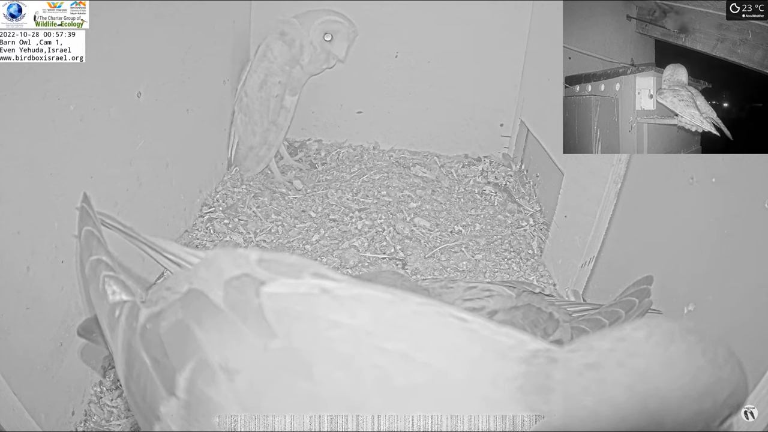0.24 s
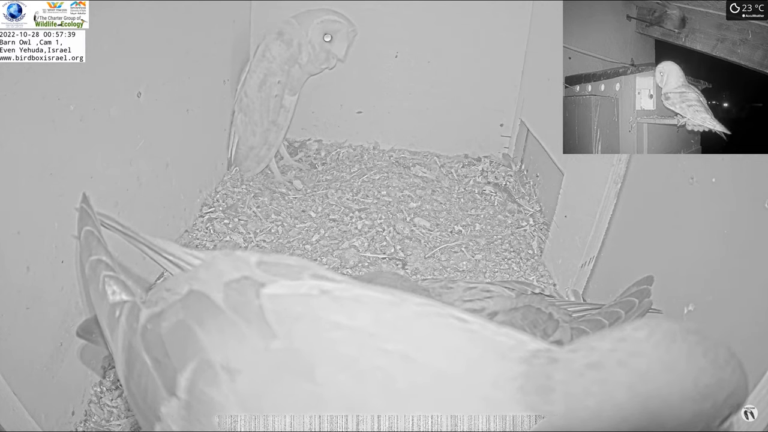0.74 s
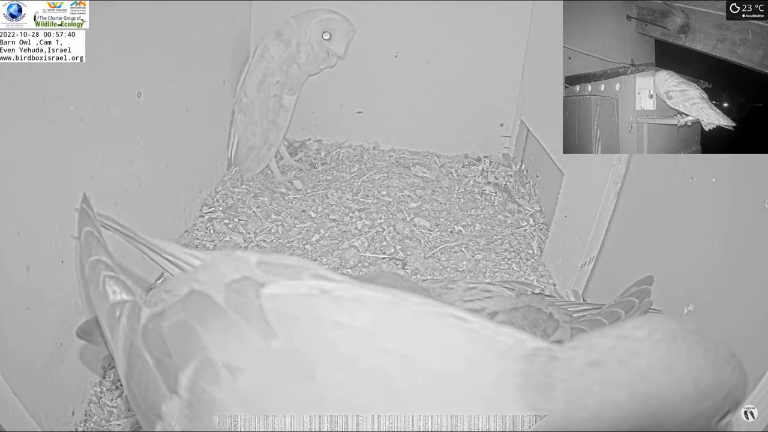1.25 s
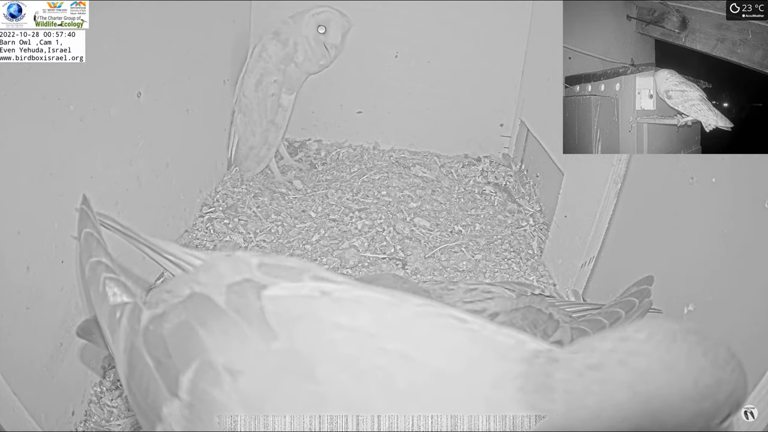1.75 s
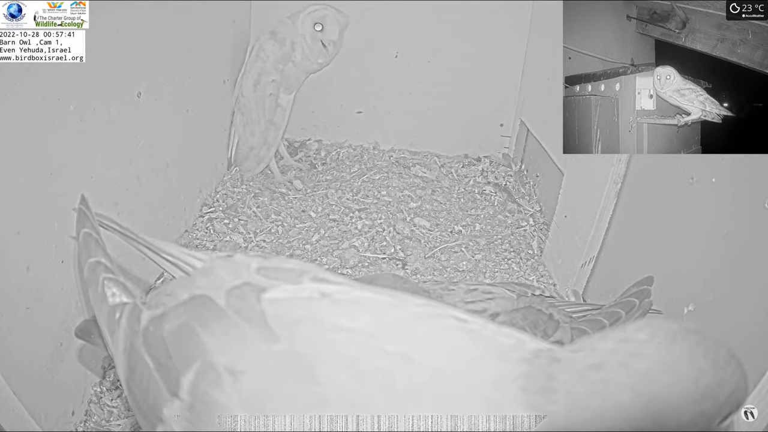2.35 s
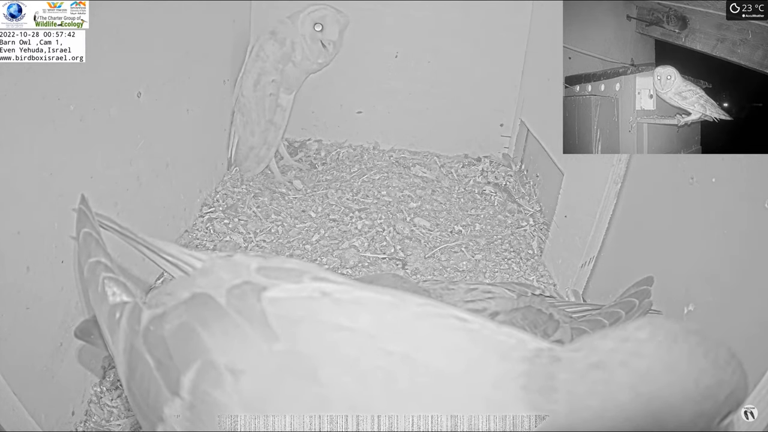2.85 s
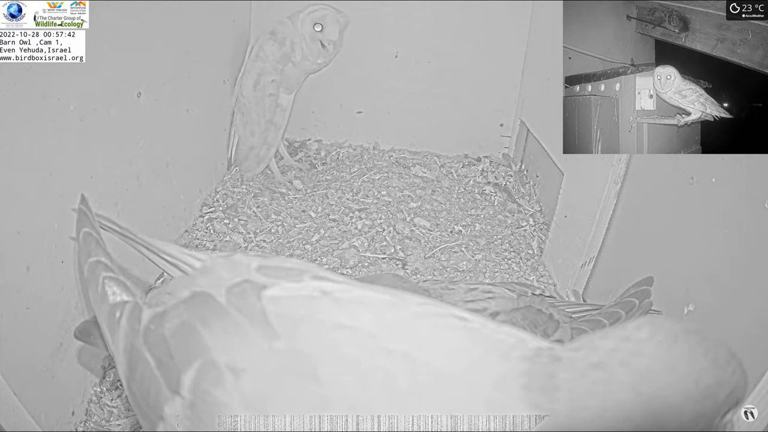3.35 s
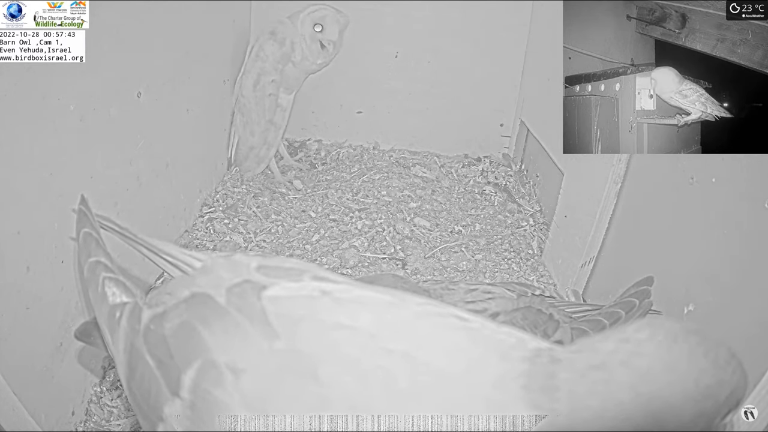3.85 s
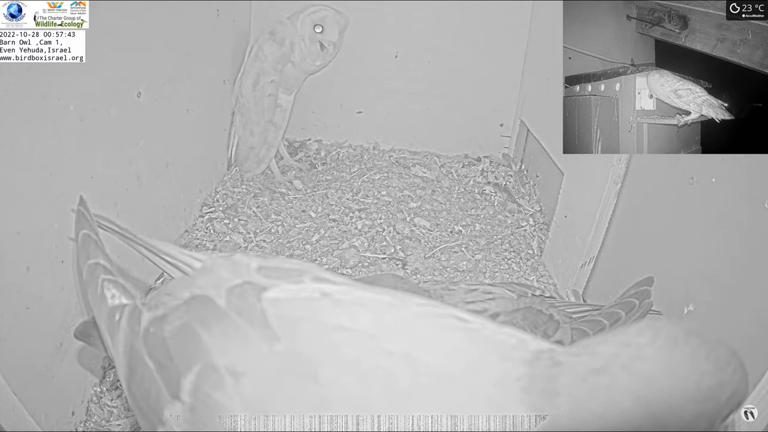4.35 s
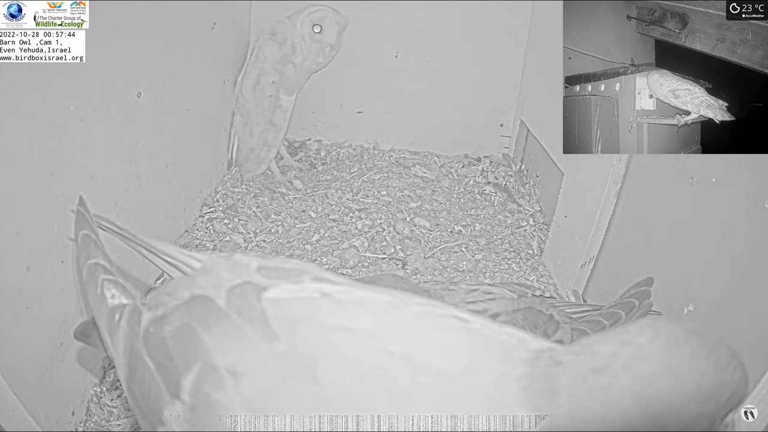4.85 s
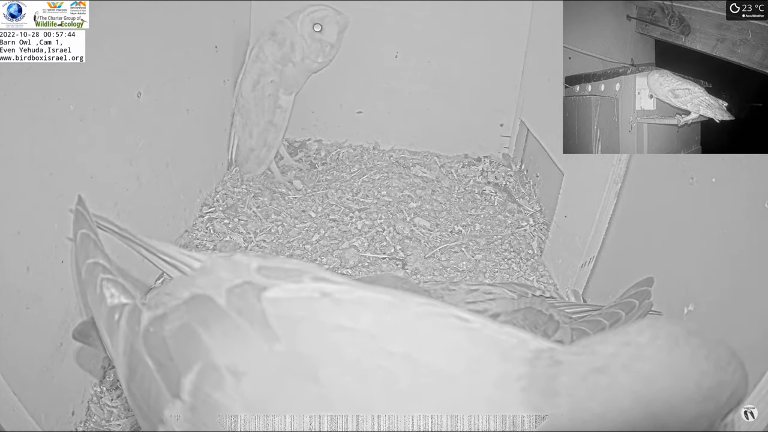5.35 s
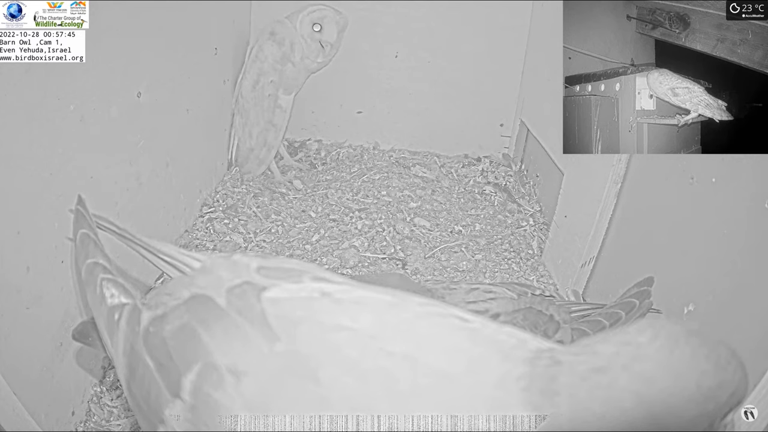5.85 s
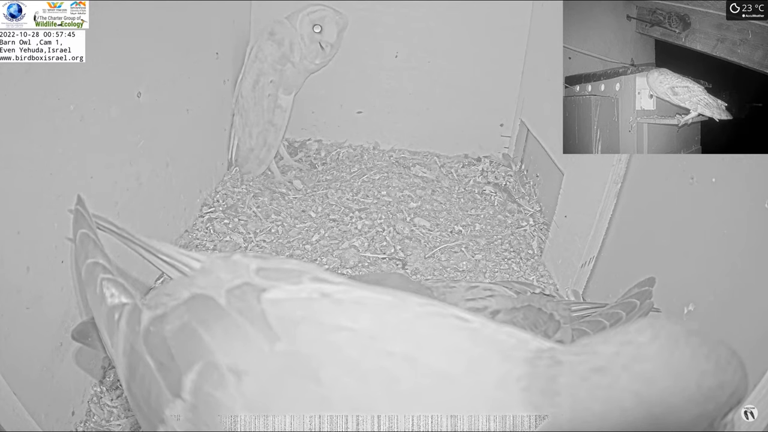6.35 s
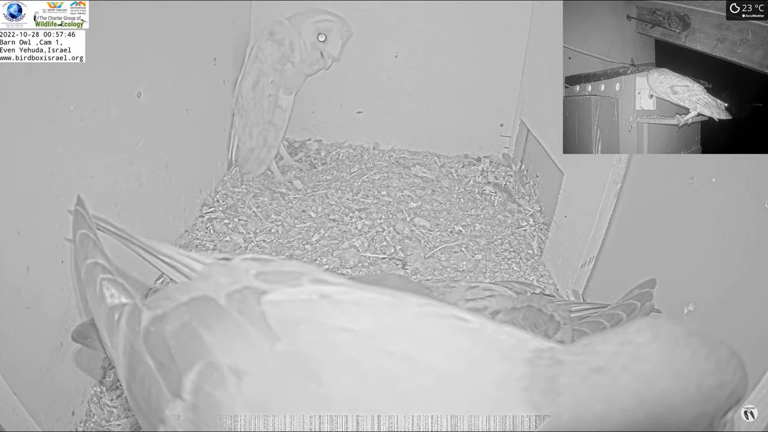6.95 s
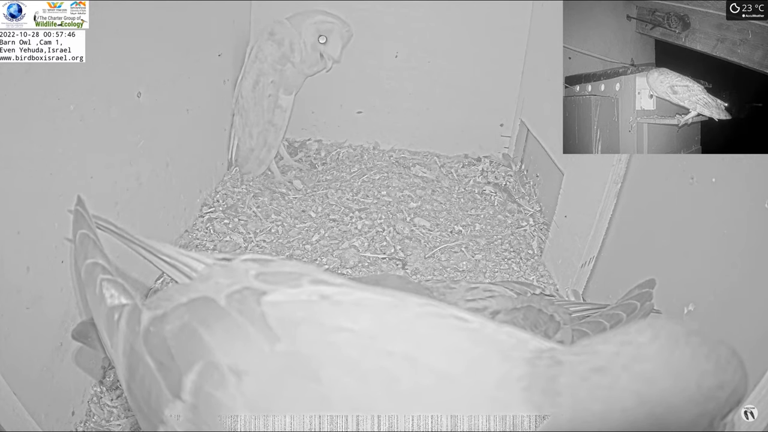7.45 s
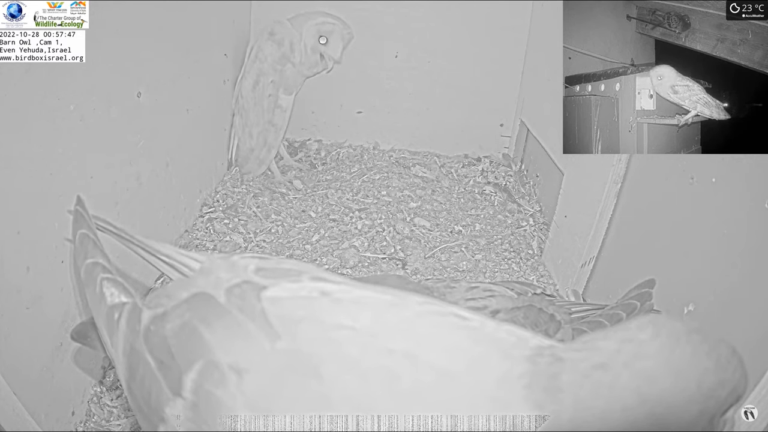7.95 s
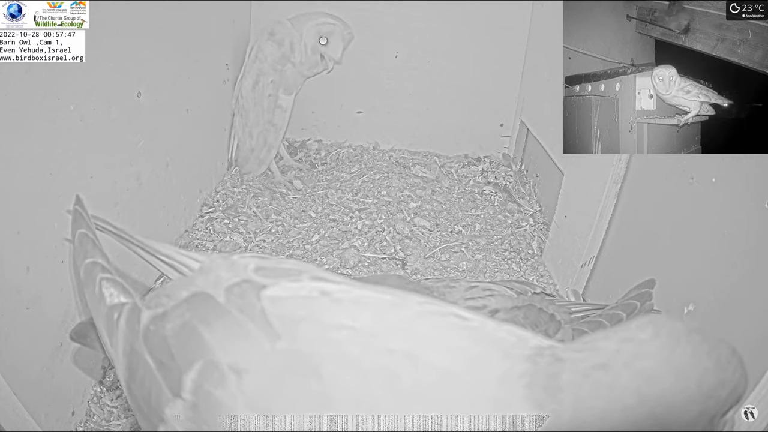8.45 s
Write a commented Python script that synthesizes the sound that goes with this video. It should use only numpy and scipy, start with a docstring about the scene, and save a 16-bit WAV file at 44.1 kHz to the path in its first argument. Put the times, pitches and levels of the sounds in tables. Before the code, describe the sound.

Inside a wooden nest box, an owl gives long rasping, hissing screeches with brief pauses, soft foot knocks, dry ticks and low hum beneath.

```python
"""The rough whistle that ends one screech, then two more long hissing screeches of a barn owl in a wooden box.
Each opens as a rush of air (shaped noise), then a rasp catches (noise ringing at the pitch of the syrinx)
and gives way towards the end to an unsteady whistle (sines); moving resonances of the bill shape the hiss.
A low hum of filtered noise lies below; feet knock (damped sines), claws scrape, dry ticks and squeaks pass,
and the sound cuts out now and then for a few milliseconds."""
import sys
import numpy as np
from scipy import signal
from scipy.fft import rfft, irfft, next_fast_len
from scipy.io import wavfile
from scipy.ndimage import uniform_filter1d

SR = 44100
rng = np.random.default_rng(int(sys.argv[2]) if len(sys.argv) > 2 else 0)


def to_wav(sig):
    """Store sig (one row per channel, or 1-D mono) as 16-bit WAV at the path in sys.argv[1].

    Samples outside -1..1 are clipped; the rate is SR.
    """
    pcm = np.clip(np.atleast_2d(sig), -1, 1) * 32767
    pcm = np.round(pcm).astype(np.int16)
    wavfile.write(sys.argv[1], SR, pcm.T)  # frames by channels


N = 383669

TIME = np.arange(N) / SR
# turbulence is shaped in overlapping frames of 2048 samples, 512 apart
FRAME_S = np.arange(N // 512 + 6)[:, None] * 512 / SR
BIN_HZ = np.fft.rfftfreq(2048, 1 / SR)

# Spectrum of the rush of air, in screeches and sighs. Each row: frequency in Hz, relative level in dB per Hz.
RUSH_SPECTRUM = [(150, -35), (200, -49.5), (240, -1.5), (305, 1.5), (360, -8.5), (480, 1.5), (570, -7),
                 (640, -2), (720, -8), (800, -30), (1000, -21), (1200, -13.5), (1500, -20.5), (2500, -43.5)]


def gain_of(db):
    """Decibels to amplitude."""
    return 10 ** (np.asarray(db) / 20)


def evened(x):
    """Scaled to an rms of one."""
    return x / np.sqrt(np.mean(x ** 2) + 1e-20)


def spectrum(points, hz):
    """Gain of a (Hz, dB) table, joined by straight lines on a log-frequency axis."""
    f, db = np.transpose(points)
    return gain_of(np.interp(np.log(hz + 1), np.log(f), db))


def curve(rows, t):
    """A (seconds, value) table read at times t."""
    s, value = np.transpose(rows)
    return np.interp(t, s, value)


def add(mix, s, sound):
    """Lays a sound into the mix at s seconds."""
    part = mix[max(round(s * SR), 0):][:len(sound)]
    part += sound[:len(part)]


def coloured(x, gain):
    """Filters x by a gain that is a function of frequency."""
    size = next_fast_len(len(x))
    hz = np.fft.rfftfreq(size, 1 / SR)
    return irfft(rfft(x, size) * gain(hz), size)[:len(x)]


def wander(rate_hz):
    """Smooth random drift of rms one, mostly slower than rate_hz, drawn at every 16th sample."""
    noise = rng.standard_normal(next_fast_len(N // 16 + 2))
    steps = coloured(noise, lambda hz: np.exp(-(hz / 16 / rate_hz) ** 2))
    return evened(np.interp(np.arange(N) / 16, np.arange(len(steps)), steps))


def resonance(hz, centre, half_width):
    """Gain of a resonance: one at its centre, a half at half_width to either side."""
    return 1 / (1 + ((hz - centre) / half_width) ** 2)


def resonances(rows, hz):
    """Summed gain of a (Hz, full width Hz, dB) table of resonances."""
    return sum(gain_of(db) * resonance(hz, f, width / 2) for f, width, db in rows)


def bumps(rows, hz):
    """Level in dB of a (Hz, width Hz, dB) table of bell-shaped peaks and notches."""
    return sum(db * 2 ** -(2 * (hz - f) / width) ** 2 for f, width, db in rows)


def box(hz):
    """Gain of the standing waves between the boards."""
    # Peaks and notches that the box gives the screeches. Each row: centre in Hz, width in Hz, height in dB.
    box_modes = [(1154, 55, -9.5), (1191, 41.7, 8.5), (1346, 61, -15.5), (1450, 110, 3.5), (1657, 78, 8.5),
                 (1766.5, 55, 15), (1792.6, 38.8, -11), (1843, 105, 6), (1948, 55, 5), (2144, 73, 8.5),
                 (2276, 45, 6), (2318, 55, -14), (2920, 55, 7), (2995, 79, 12), (3036, 41, -20),
                 (3350, 83, 10.5), (3967, 130, -2), (4265, 75, 6.5), (6170, 220, -5), (6400, 79, 3.5),
                 (6800, 53, -18), (6860, 160, 1.5), (7350, 55, 2), (7700, 490, -4.5), (8570, 150, 6.5),
                 (9211, 18, 7.5), (9480, 180, 7.5), (9790, 120, 3), (10600, 95, -3.5), (11450, 97, 3),
                 (1868, 30, 2), (10300, 110, -8)]
    return gain_of(bumps(box_modes, hz))


def walls(x, t60=0.025, wet_db=-7):
    """Dense early echoes between the close walls comb the treble finely."""
    t = np.arange(SR // 10) / SR
    echo = rng.standard_normal(len(t)) * gain_of(-60 * t / t60) * (t > .002)
    echo *= gain_of(wet_db) / np.linalg.norm(echo)
    echo[0] = 1  # the direct sound
    return signal.oaconvolve(x, echo / np.linalg.norm(echo))[:N]


def turbulence(shape):
    """Noise of steady power in a moving spectral shape, heard through the box."""
    gain = shape * box(BIN_HZ) * np.ones_like(FRAME_S)
    gain = gain / np.linalg.norm(gain, axis=1, keepdims=True)
    z = gain * (rng.standard_normal(gain.shape) + 1j * rng.standard_normal(gain.shape))
    return evened(signal.istft(z.T, nperseg=2048, noverlap=1536)[1][:N])


def course(t):
    """The screech under way at times t, and how far it has caught, swollen, tired and faded (each 0-1)."""
    # The screeches. Each row: start in seconds, when the rasp catches in seconds, end in seconds,
    # length of the last fade in seconds, time of locking into a whistle in seconds, rush level in dB,
    # rasp level in dB, harsh upper rasp level in dB, hiss level in dB, top hiss level in dB,
    # change of the hiss before the catch in dB, its drift after the catch in dB per second,
    # high hiss resonance after the catch in dB, first hiss resonance in Hz.
    screeches = np.array([(-3, -2.5, .238, .035, 1.6, -65.5, -58.5, -72.5, -74.5, -80.5, -6, 0.5, -16, 6400),
                          (0.8846, 1.5, 5.42, 0.4, .17, -59.4, -56.7, -68.3, -63.8, -63.2, -7.5, -2.5, 0, 6260),
                          (6.11, 6.5, 11.7, .36, .17, -60.9, -51.8, -60.8, -67, -67, -4, 1.37, -8, 5900)])
    catch_s, swell_s, tire_s = 0.072, 1.08, 3.0
    row = np.moveaxis(screeches[np.searchsorted(screeches[:, 0], t, "right") - 1], -1, 0)
    _, catch, end, fade_s = row[:4]
    caught = .5 + .5 * np.tanh((t - catch) / (2 * catch_s))
    swollen = 1 - np.exp(-np.maximum(t - catch, 0) / swell_s)
    tired, faded = (np.clip(1 - (end - t) / length, 0, 1) for length in (tire_s, fade_s))
    return row, caught, swollen, tired, faded


def effort():
    """Gains of the rush, the rasp, the harsh upper rasp, the hiss and its top through all the screeches."""
    attack_s, hiss_attack_s, release_s = 0.065, 0.1, 0.0078
    # each layer's change in dB: before the catch, as the rasp swells, once the owl is tired, in the last fade
    rush_early_db, rush_swell_db, rush_tired_db, rush_fade_db = 1.45, -2.5, 2.6, -12.5
    rasp_early_db, rasp_swell_db, rasp_tired_db, rasp_fade_db = -12.5, 9, -7.7, -4.3
    hiss_tired_db, hiss_fade_db, top_fade_db = -3.5, -6, -9
    # the harsh upper rasp: its level before the catch, its rise after it, its change in the last fade
    harsh_idle_db, harsh_db_per_s, harsh_fade_db = -79.5, 4.35, -9

    row, caught, swollen, tired, faded = course(TIME)
    start, catch, end, _, _, rush_db, rasp_db, harsh_db, hiss_db, top_db, early_hiss_db, drift_db_per_s, *_ = row
    early = 1 - caught
    rasping_s = np.maximum(TIME - catch, 0)
    release = np.clip((end - TIME) / release_s, 0, 1)
    voice_on, hiss_on = (release * (1 - np.exp(-(TIME - start) / rise)) for rise in (attack_s, hiss_attack_s))

    rush = rush_db + rush_early_db * early + rush_swell_db * swollen
    rush += rush_tired_db * tired + rush_fade_db * faded ** 2
    rasp = rasp_db + rasp_early_db * early + rasp_swell_db * swollen
    rasp += rasp_tired_db * tired ** 2.1 + rasp_fade_db * faded
    harsh = harsh_idle_db * early + harsh_db * caught + harsh_db_per_s * rasping_s + harsh_fade_db * faded
    blow = early_hiss_db * early + drift_db_per_s * rasping_s
    hiss = hiss_db + blow + hiss_tired_db * np.sqrt(tired) + hiss_fade_db * faded
    top = top_db + blow + top_fade_db * faded
    voice_gains = voice_on * gain_of([rush, rasp, harsh])
    return *voice_gains, hiss_on ** 1.5 * gain_of(hiss), hiss_on ** 2 * gain_of(top)


def syrinx(t):
    """Pitch in Hz, share of the rasp that is a whistle, and the narrow ring at the pitch in dB."""
    # The first whistle cracks once: time in seconds, half length in seconds, pitch lift in Hz,
    # share of the whistle lost (0-1).
    crack_s, crack_length, lift_hz, lost = (0.089, 0.02502, 49.65, .4)
    # the pitch sags with tiring and drops as the voice stops
    pitch_hz, sag_hz, drop_hz, drop_s = 1763, 275.3, 140, .014
    # the ring sharpens as the rasp swells
    ring_early_db, ring_swell_db, ring_tired_db = -5, 24.5, -11.5
    # share of whistle (0-1): far from the end of a screech and at the very end
    whistle_least, whistle_most = 0.039, 0.933

    (_, _, end, _, lock_s, *_), _, swollen, tired, _ = course(t)
    left = np.maximum(end - t, 0)
    crack = np.exp(-((t - crack_s) / crack_length) ** 2)
    pitch = pitch_hz - sag_hz * tired - drop_hz * np.exp(-left / drop_s) + lift_hz * crack
    share = whistle_least + (whistle_most - whistle_least) * np.exp(-left / lock_s)
    ring_db = ring_early_db + ring_swell_db * swollen + ring_tired_db * tired
    return pitch, share * (1 - lost * crack), ring_db


def whistle(pitch, share, jitter=.035, steady_jitter=0.00589, jitter_hz=190, shimmer_db=3.5, third_db=-24):
    """The syrinx swings more steadily the more it locks: fundamental and overtones, heard through the box."""
    unsteady = steady_jitter + jitter * (1 - share)
    turns = np.cumsum(pitch * (1 + unsteady * wander(jitter_hz))) / SR
    swing = gain_of(shimmer_db * wander(160))
    first, second, third = (swing * np.sin(2 * np.pi * k * turns) for k in range(1, 4))
    parts = coloured(first, box), coloured(second + gain_of(third_db) * third, box)
    # each part is held to an rms near one over 57 ms
    return [x / np.sqrt(uniform_filter1d(x ** 2, size=2500) + 1e-9) for x in parts]


def bill_shape(high_hz=11950, high_half_width_hz=650, high_early_db=-13, middle_growth=1.3):
    """The hiss resonances slide and widen as the bill opens; its notches fill in and new peaks come out."""
    # Broad spectrum of the hiss. Each row: frequency in Hz, relative level in dB per Hz.
    hiss_spectrum = [(2500, -33), (4000, -2), (5000, -2.5), (7000, 1), (10500, 0.5), (12600, 3.5),
                     (13150, 0), (13450, -16), (15200, -10), (16000, -30)]
    # How wide the bill is open. Each row: time in seconds, opening (0-1).
    bill_opening = [(.25, .48), (.9, .03), (1.6, .07), (2.3, 0.17), (3.3, 0.6), (5.3, 0.92), (6.1, 0.04),
                    (6.5, 0.17), (7.3, 0.5), (8.7, 0.6)]
    # Resonances that come out as the gape widens. Each row: centre in Hz, width in Hz,
    # level in dB against the turbulence between the resonances.
    gape_peaks = [(5150, 150, 7.5), (10580, 290, 12), (7840, 400, -3)]
    # Side-cavity notches, fading as the bill opens. Each row: centre in Hz, width in Hz, dB when shut.
    side_notches = [(4500, 680, -7.5), (7930, 440, -6), (9500, 210, -14), (11200, 280, -2)]
    # Weaker resonances of the nearly shut bill. Each row: centre in Hz, width in Hz, level in dB when shut.
    side_peaks = [(5280, 400, -9.5), (5820, 320, -5.5), (9260, 160, -9), (10230, 240, -11),
                  (11700, 220, -12)]
    # A notch that climbs as the bill opens: Hz when shut, climb in Hz, width in Hz, depth in dB.
    notch_hz, climb_hz, notch_width, notch_db = (4600, 2200, 750, -7.5)
    # The upper edge of the hiss sinks as the bill opens: Hz when shut, fall in Hz, width in Hz, depth in dB.
    edge_hz, fall_hz, edge_width, edge_db = (13400, 800, 260, -3)
    # With tiring the low resonance hands over to a deeper one: Hz, half width in Hz, share handed over (0-1).
    deep_hz, deep_half_width, handover = (5800, 260, 0.55)
    # throat and bill resonances move as the rasp catches, then slide up as the bill opens
    low_hz, low_slide_hz, low_half_width_hz, low_early_half_width_hz = 6690, 350, 460, 130
    middle_hz, middle_jump_hz, middle_slide_hz = 8680, 119, 990
    middle_half_width_hz, middle_blur_hz = 190, 280
    shut_db, open_db = -20.5, 2.5  # turbulence between those resonances

    (*_, high_db, first_hz), caught, _, tired, _ = course(FRAME_S)
    early = 1 - caught
    opening = np.clip(curve(bill_opening, FRAME_S), 0, 1)
    nearly_shut = (1 - opening) ** 2
    between = gain_of(shut_db + (open_db - shut_db) * opening)

    low = early * first_hz + caught * (low_hz + low_slide_hz * opening)
    low_half_width = early * low_early_half_width_hz + caught * low_half_width_hz
    middle = middle_hz + middle_jump_hz * caught + middle_slide_hz * opening
    middle_half_width = middle_half_width_hz + middle_blur_hz * between
    high_gain = gain_of(early * high_early_db + caught * high_db)
    peaks = (1 - handover * tired) * resonance(BIN_HZ, low, low_half_width)
    peaks += handover * tired * (1 + between) * resonance(BIN_HZ, deep_hz, deep_half_width)
    peaks += (1 + middle_growth * between) * resonance(BIN_HZ, middle, middle_half_width)
    peaks += high_gain * resonance(BIN_HZ, high_hz, high_half_width_hz)
    peaks += nearly_shut * resonances(side_peaks, BIN_HZ)

    gape = 1 + resonances(gape_peaks, BIN_HZ)
    edge = gain_of(edge_db / 2 * (1 + np.tanh((BIN_HZ - edge_hz + fall_hz * opening) / edge_width)))
    notches = nearly_shut * bumps(side_notches, BIN_HZ)
    notches = notches + bumps([(notch_hz + climb_hz * opening, notch_width, notch_db)], BIN_HZ)
    return spectrum(hiss_spectrum, BIN_HZ) * (peaks + between * gape) * edge * gain_of(notches)


def owl(ring_half_width_hz=32, flutter_db=0.46, grit_db=1.0, pulsing_db=0.39, waver=.011):
    """Air rushes through the throat; the syrinx rasps or whistles; the open bill hisses."""
    # Spectra of the rasp and its harsh upper part. Each row: frequency in Hz, relative level in dB per Hz.
    rasp_spectrum = [(700, -70), (1000, -27), (1200, -11), (1450, -1.5), (1800, -4.5), (2000, -7),
                     (2400, -53), (3500, -47)]
    harsh_spectrum = [(1400, -63), (1850, -5), (2100, 2), (2400, -3.5), (2900, -6.5), (3400, -13.5),
                      (3750, -20.5), (4500, -22), (6000, -33.5), (9000, -63)]
    rush_gain, rasp_gain, harsh_gain, hiss_gain, top_gain = effort()

    ring_hz, _, ring_db = syrinx(FRAME_S)
    ring = gain_of(ring_db) * resonance(BIN_HZ, ring_hz, ring_half_width_hz)
    rasp = turbulence(spectrum(rasp_spectrum, BIN_HZ) * (1 + ring))
    # a steady push of air evens out the swells of the rasp
    rasp = evened(rasp / (uniform_filter1d(rasp ** 2, size=700) + 1e-6) ** 0.25)
    harsh = turbulence(spectrum(harsh_spectrum, BIN_HZ))

    # as the air runs out, the chaotic rasp locks into a whistle and its overtones
    pitch, share, _ = syrinx(TIME)
    share = np.clip(share, 0, 1)
    tone, overtones = whistle(pitch * (1 + waver * wander(30.08)), share)
    voice = rasp_gain * (np.sqrt(1 - share) * rasp + np.sqrt(share) * tone)
    voice += harsh_gain * (np.sqrt(1 - share) * harsh + np.sqrt(share) * overtones)

    # the hiss and its top cross over between 7700 and 8300 Hz
    bill = bill_shape()
    upper = np.clip((BIN_HZ - 7700) / 600, 0, 1)
    hiss = hiss_gain * turbulence(bill * np.sqrt(1 - upper))
    hiss += top_gain * turbulence(bill * np.sqrt(upper))
    rush = rush_gain * turbulence(spectrum(RUSH_SPECTRUM, BIN_HZ))

    # the airflow shakes, slowly and quickly, and carries voice and hiss with it
    shake_db = flutter_db * wander(25) + grit_db * wander(220)
    voice *= evened(gain_of(shake_db + pulsing_db * wander(7.4)))
    hiss *= evened(gain_of(0.99 * shake_db))
    return rush + voice + walls(hiss)


def background():
    """A low hum of changing level over the faint noise of the box, both filtered noise."""
    # Spectra of the hum and of the still air. Each row: frequency in Hz, relative level in dB per Hz.
    hum_spectrum = [(12, -11), (25, -10.5), (38, -9), (52, 4.5), (62, -5), (69, 7), (77, 0), (100, -7.5),
                    (125, -21), (165, -18.5), (250, -60.5)]
    air_spectrum = [(88, -51), (150, -36), (229, 2), (324, -5.5), (364, -18), (468, -11), (545, -24),
                    (636, -16), (954, -39.5), (1230, -24.5), (1600, -34.5), (1800, -32), (3540, -46.5),
                    (12100, -64), (15000, -60)]
    # Course of the hum. Each row: time in seconds, level in dB.
    hum_level = [(.4, -51), (.8, -56), (1.25, -54), (1.7, -59.5), (5.2, -59.5), (5.65, -56.5), (6.2, -61),
                 (8.7, -61)]
    air_db = -66
    hum = evened(coloured(rng.standard_normal(N), lambda hz: spectrum(hum_spectrum, hz)))
    air = evened(coloured(rng.standard_normal(N), lambda hz: spectrum(air_spectrum, hz)))
    return gain_of(curve(hum_level, TIME)) * hum + gain_of(air_db) * air


def thud(t, db, hz, t60, rise_s=0.0038):
    """One damped swing of wood."""
    return gain_of(db - 60 * t / t60) * np.sin(2 * np.pi * hz * t) * (1 - np.exp(-t / rise_s))


def knocks():
    """Each step thuds in a board, and a claw may scrape with it; heavier moves rock the box."""
    # Feet on the boards. Each row: start in seconds, thud level in dB, claw scrape level in dB,
    # both levels before the decay.
    steps = [(.217, -30.5, -90), (0.301, -44, -61.5), (.353, -42.5, -57), (0.392, -40.5, -71),
             (0.432, -43, -71), (.648, -39.5, -79), (.688, -48, -74), (1.306, -55, -57.5),
             (1.97, -43.5, -85), (3.288, -44.5, -85), (5.632, -43.5, -58), (5.879, -46, -92)]
    # What a scraping claw rings with. Each row: centre in Hz, width in Hz, level in dB.
    claw_ring = [(626, 93, 18.5), (1340, 470, 9.5), (2800, 550, 0), (5400, 2500, -7.5)]
    # Heavier shifts of weight. Each row: start in seconds, level before the decay in dB, pitch in Hz.
    thumps = [(.318, -38, 81.5), (1.255, -37.5, 31.4), (2.238, -35, 29.2), (3.258, -33.5, 30.4),
              (3.292, -43.5, 99), (4.565, -41, 35.2), (4.6, -51.5, 120)]
    board_hz, board_t60, scrape_t60, thump_t60 = 241.5, .08, .05, .19  # decay times in seconds
    out, t = np.zeros(N), np.arange(SR // 3) / SR
    for s, db, claw_db in steps:
        scrape = evened(coloured(rng.standard_normal(len(t)), lambda hz: resonances(claw_ring, hz)))
        scrape *= gain_of(claw_db - 60 * t / scrape_t60)
        add(out, s, thud(t, db, board_hz, board_t60) + scrape)
    for s, db, hz in thumps:
        add(out, s, thud(t, db, hz, thump_t60))
    return out


def sighs():
    """Thin air through the owl's bill once its voice has stopped: short tapered noises."""
    # Faint air between screeches. Each row: start in seconds, length in seconds,
    # sibilance level in dB, low rush level in dB, both before the taper.
    breaths = [(0.249, 0.15, -81, -66), (0.62, 0.11, -103, -66.5), (5.435, 0.073, -83, -93.5),
               (5.492, 0.084, -86.5, -81), (5.553, 0.16, -101, -67.5)]
    # Spectrum of the sibilance. Each row: frequency in Hz, relative level in dB per Hz.
    sibilance = [(2500, -10), (3500, -12), (6200, -8), (7200, 3), (8200, -12), (9100, -10), (9400, 0),
                 (9800, -16), (12200, -13), (13500, -19)]
    out = np.zeros(N)
    for s, length, thin_db, low_db in breaths:
        for shape, db in ((sibilance, thin_db), (RUSH_SPECTRUM, low_db)):
            air = coloured(rng.standard_normal(SR // 2), lambda hz: spectrum(shape, hz))
            air = air[:round(length * SR)]
            add(out, s, gain_of(db) * evened(air) * signal.windows.tukey(len(air), .5))
    return out


def ticks(fall_s=0.00086):
    """Dry ticks: a sudden step that falls away at once."""
    # The ticks. Each row: start in seconds, peak in dB.
    tick_times = [(.665, -61), (.887, -60), (2.171, -42), (2.423, -39.5), (3.418, -44), (3.519, -43.5),
                  (3.934, -52.5), (5.106, -46), (8.242, -50)]
    out, t = np.zeros(N), np.arange(SR // 50) / SR
    for s, db in tick_times:
        add(out, s, gain_of(db) * np.exp(-t / fall_s))
    return out


def squeaks(length_s=0.032, jitter=0.016):
    """The tiring rasp catches in a quick run of squeaks: regular swings with strong overtones."""
    # Partials of a squeak. Each row: multiple of the pitch, level in dB against the squeak's own.
    squeak_tones = [(1, 1), (2, 3), (3, -14.5), (4, -19), (5, -18.5)]
    from_s, to_s, gap_s, scatter_s = 4.9, 5.38, .0457, .007
    pitch_hz, pitch_spread, level_db, spread_db = 1440, .06, -56.3, 4.5  # pitch spread as a fraction
    out, swell = np.zeros(N), np.hanning(round(length_s * SR))
    waver = 1 + jitter * wander(200)
    for s in np.arange(from_s, to_s, gap_s):
        sharp, loud, late = rng.uniform(-1.02, 1, 3)
        hz = pitch_hz * (1 + pitch_spread * sharp)
        db = level_db + spread_db * loud
        turns = np.cumsum(hz * waver[round(s * SR):][:len(swell)]) / SR
        tone = sum(gain_of(db + d) * np.sin(2 * np.pi * k * turns) for k, d in squeak_tones)
        add(out, s + scatter_s * late - length_s / 2, swell * tone)
    return out


def scene():
    """Everything at the one microphone."""
    return (owl() + background() + knocks() + sighs() + ticks() + squeaks())[None]


def record(dry):
    """The sound cuts out to a small constant offset, which clicks at its edges; then the treble is cut."""
    # The gaps. Each row: start in seconds, length in seconds, level of the offset in dB.
    dropouts = [(.8163, .0067, -68), (3.4423, .0108, -66), (5.038, .005, -66), (5.5937, .0023, -53),
                (5.9587, .0023, -53), (7.683, .003, -56)]
    edge_hz = 15450
    cut = dry.copy()
    for s, length, click_db in dropouts:
        cut[:, round(s * SR):round((s + length) * SR)] = gain_of(click_db)
    low_pass = signal.firwin(511, edge_hz, window=("kaiser", 9), fs=SR)
    return signal.oaconvolve(cut, low_pass[None], "same")


dry = scene()
out = record(dry)
to_wav(out)
```